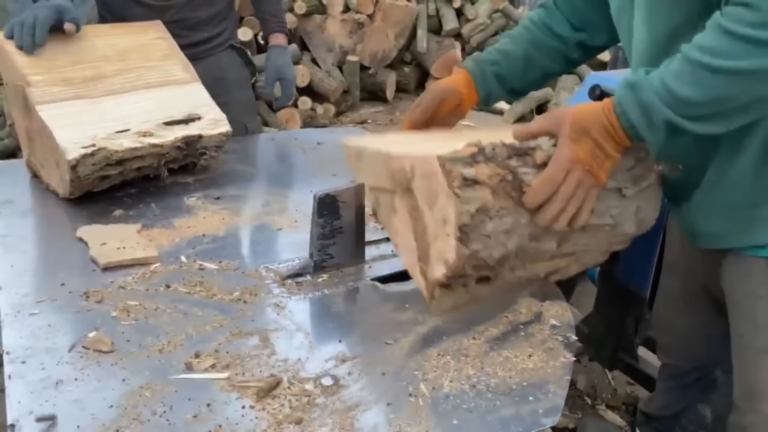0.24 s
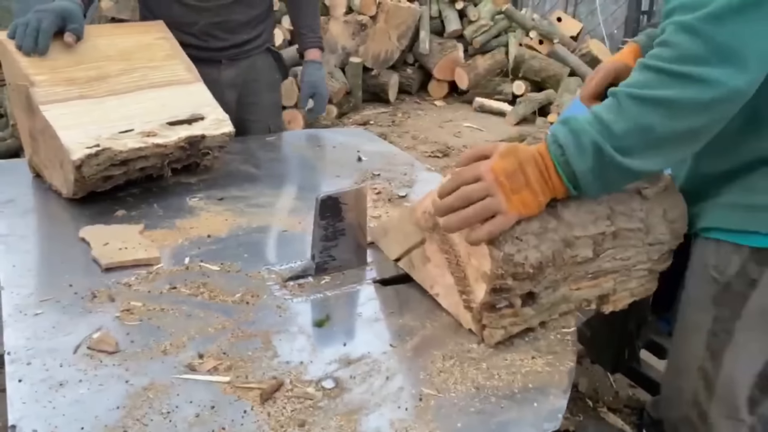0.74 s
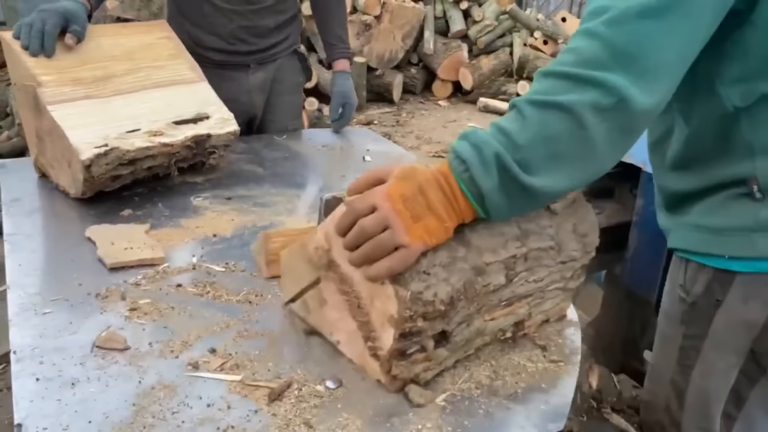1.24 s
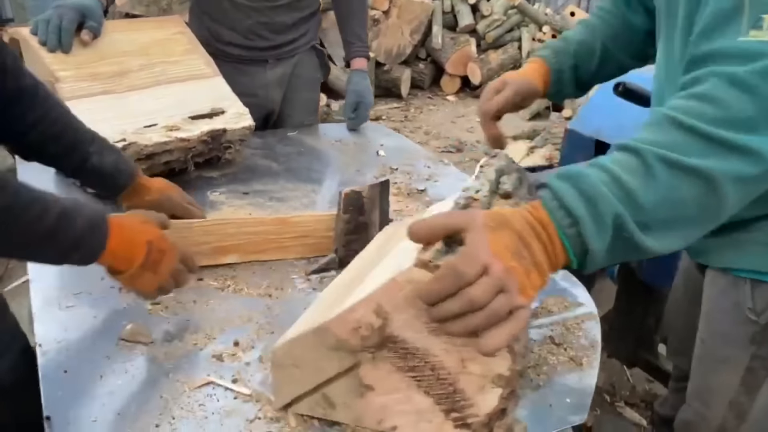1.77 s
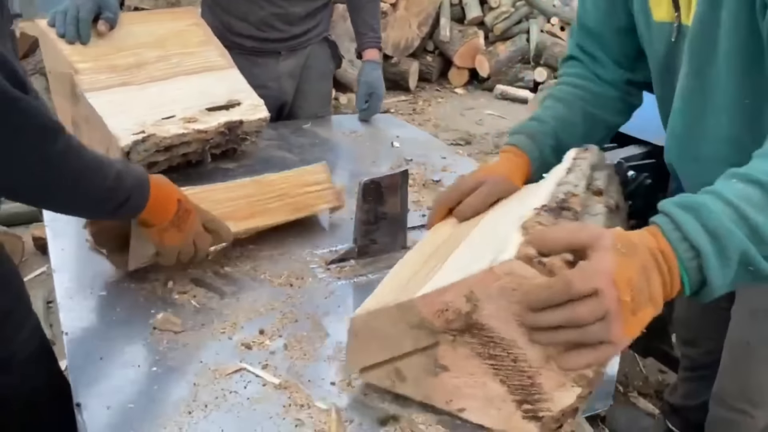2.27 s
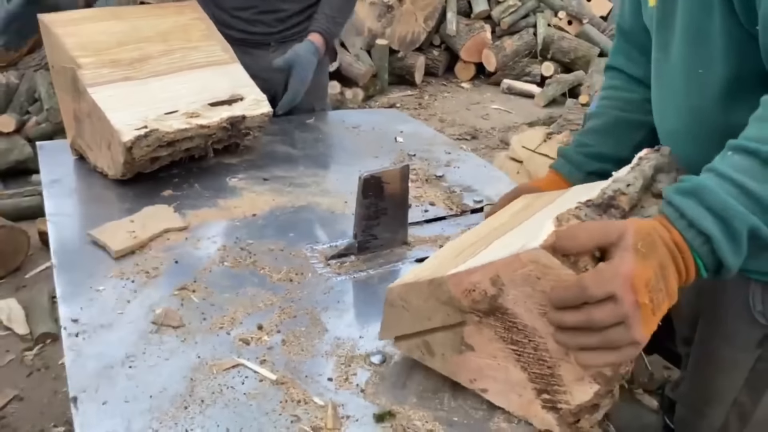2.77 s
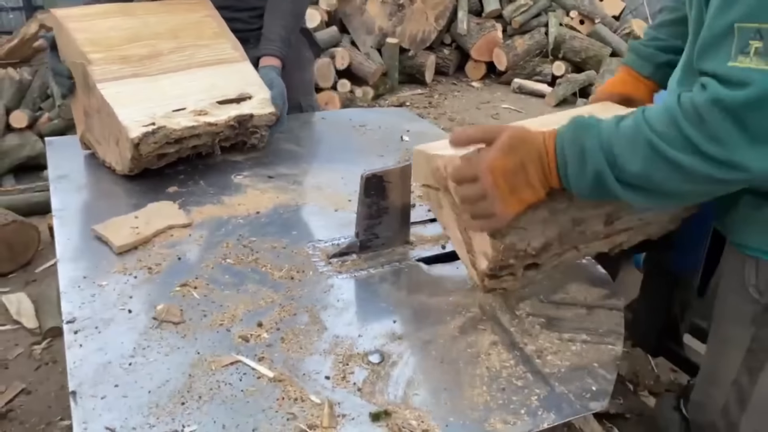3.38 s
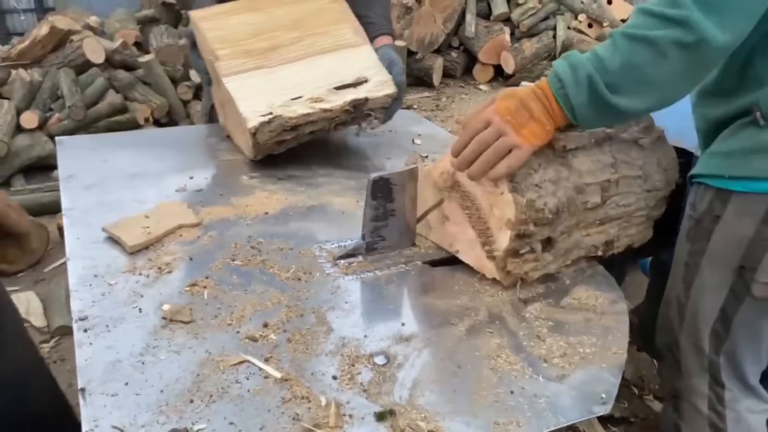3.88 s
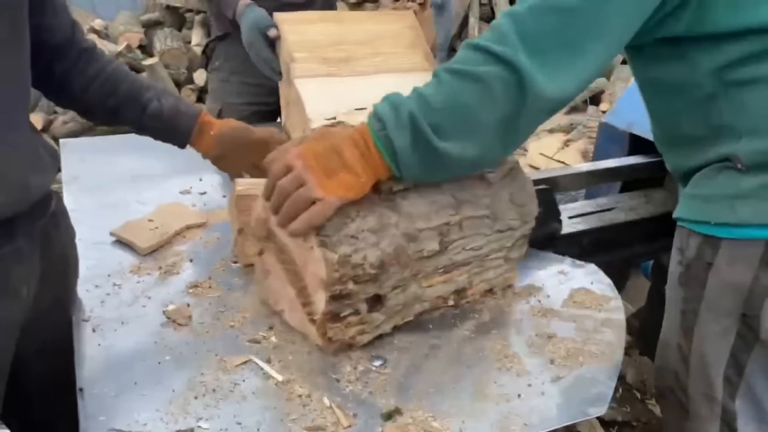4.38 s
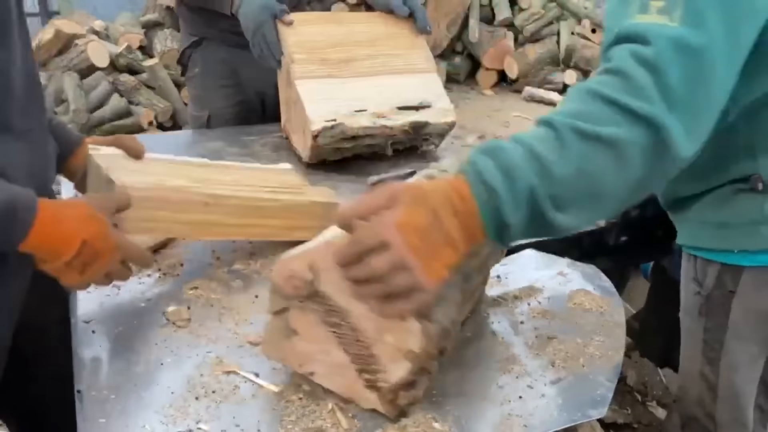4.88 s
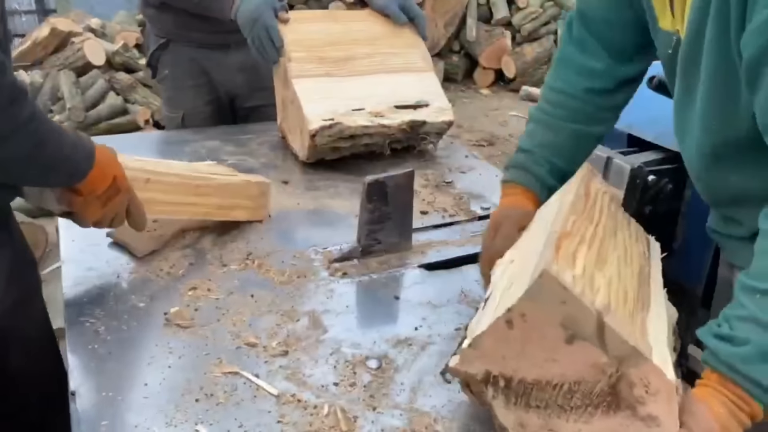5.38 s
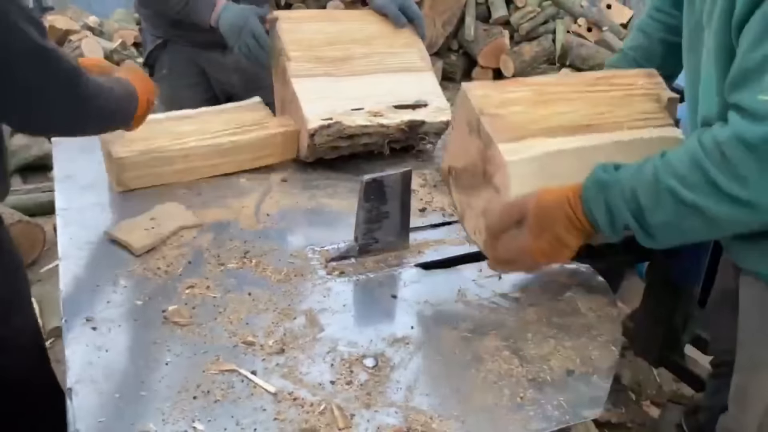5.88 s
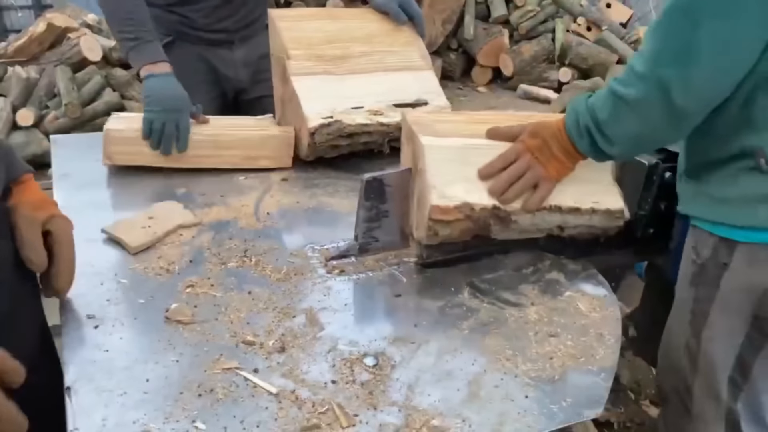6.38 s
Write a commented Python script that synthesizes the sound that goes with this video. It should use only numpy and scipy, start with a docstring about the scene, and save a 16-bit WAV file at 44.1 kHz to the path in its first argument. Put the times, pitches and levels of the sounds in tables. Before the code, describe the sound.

Over a steady low motor drone with a faint whine, a log bangs onto a hollow steel table. A wedge cracks it in sharp runs, fibres tear, and the piece judders aside. It is knocked back down and split again, then shuffled, clonked and banged once more. Close stereo microphone, outdoors, dry, no echo.

```python
"""First a steel frame is heard ringing out while wood slides; then logs thump onto a log splitter's steel table.
The wedge cracks each log open and tears it apart: random tiny impulses wake the wood and table resonances.
Halves judder and creak (gliding tones), bark rasps (narrow noise), and chips tick on the steel.
Underneath, a motor drones (coloured noise) and whines (wavering sines), and oil hisses as the ram travels."""
import sys
import numpy as np
from scipy import signal
from scipy.fft import rfft, irfft, next_fast_len
from scipy.io import wavfile
from scipy.ndimage import uniform_filter1d, map_coordinates

SR = 44100
rng = np.random.default_rng(int(sys.argv[2]) if len(sys.argv) > 2 else 0)


def inscribe(sig):
    """Save sig as 16-bit PCM at rate SR to the path in sys.argv[1].

    A 1-D sig is mono; a 2-D sig holds one channel per row.
    Samples are clipped to [-1, 1] before scaling.
    """
    pcm = np.round(np.clip(np.atleast_2d(sig).T, -1, 1) * 32767)
    wavfile.write(sys.argv[1], SR, pcm.astype(np.int16))


N = 292383
TIME = np.arange(N) / SR  # [s]

# All levels in the tables are relative; t60 is the time to fade by 60 dB.
# Motor-driven machine, broad noise: (frequency [Hz], level per Hz [dB])
DRONE_COLOUR = [(30, -50), (50, -16), (95, -2), (145, 1), (220, -9), (320, -14), (500, -15.5), (800, -24),
                (2300, -20.5), (3000, -26.5), (5200, -28), (7800, -43), (11000, -48.5)]
# Motor and pump tones: (frequency [Hz], level [dB])
WHINE_TONES = [(96.9, -38), (226.1, -46), (1077, -58.5), (1615, -53.5), (2417, -50.5), (5109, -63.5)]
# Ram pushing a log through the wedge:
# (wedge bites [s], halves part [s], burst level [dB], tearing level [dB], parting level [dB])
SPLITS = [(0.895, 1.989, -23, -30.5, -22), (3.854, 5.003, -16.5, -35.5, -23.5)]
# The steel frame ringing at the start: (frequency [Hz], level [dB], t60 [s])
FRAME_MODES = [(630, -2.5, 0.35), (1066, -5, 0.48), (1600, -4.5, 0.33), (2500, -6.5, 0.24)]
# Loose chips ticking on steel: (time [s], level [dB], pitch [Hz], t60 [s])
CHIP_TICKS = [(0.492, -24, 3350, 0.11), (0.577, -34, 3300, 0.13), (3.119, -34, 5600, 0.02),
              (4.43, -37.5, 10500, 0.069)]
# Bark rubbing the edge of the steel slot: (from [s], to [s], centre [Hz], width [Hz], level [dB])
RASPS = [(5.823, 5.984, 5120, 300, -37.5), (6.106, 6.288, 6050, 450, -41)]
# A log chattering on the sheet: (from [s], to [s], first rate [Hz], last rate [Hz], level [dB])
JUDDERS = [(1.941, 2.286, 112.6, 97.8, -22), (2.283, 2.912, 102.8, 95, -31), (4.21, 4.32, 98, 98, -22.5),
           (4.95, 5.23, 101.4, 88.7, -25), (5.9, 6.09, 119.6, 107.6, -20.5),
           (6.11, 6.25, 139.5, 129.6, -20.5)]
# Pressed wood creaking on steel: (from [s], to [s], first rate [Hz], last rate [Hz], level [dB])
CREAKS = [(4.4, 4.46, 556, 537, -30.5), (4.85, 4.95, 740, 685, -32), (5.94, 6.03, 605.5, 599, -29.5)]
# Resonances of a split-off piece: (frequency [Hz], level [dB], t60 [s])
BILLET_MODES = [(679, -7, 0.29), (990, -5.5, 0.28), (1362, -1.5, 0.072), (1984, -5, 0.06)]
# The piece is set down and rocks: (time [s], level [dB])
BILLET_HITS = [(5.141, -13), (5.153, -21), (5.175, -18.5)]
# Table top flexing under a log: (frequency [Hz], level over the thud [dB], t60 [s])
BOOM_MODES = [(135.2, -5.5, 0.28), (208.4, -3.5, 0.15)]
# Wood landing on or bumping the table:
# (time [s], level [dB], thud [dB], clack [dB], snap [dB], contact length [s])
KNOCKS = [(0.264, -4.5, -13, -2.5, -8, 0.0074), (0.367, -4, -4.5, -8.5, -23, 0.0078),
          (0.378, -5, -7.5, -5.5, -7, 0.0098), (0.49, -23.5, -3, 3, -3, 0.0098),
          (2.43, -21, -30, -9, -21, 0.049), (3.534, -6.5, -14, -3.5, -11, 0.034),
          (3.58, -5.5, -3, -6.5, -3, 0.028), (4.467, -8.5, -30, -6.5, -30, 0.03),
          (5.14, -16, -7, -1, -15.5, 0.011), (5.619, -31.5, 18.5, 0, -2, 0.023),
          (5.845, -9.5, -2.5, -11, -17, 0.019), (5.899, -12, -12, -11.5, -8.5, 0.035),
          (5.964, -12, -2, -19, -12.5, 0.018), (6.13, -16.5, 6, -4, -1, 0.009),
          (6.184, -14, 0.5, -12, -10, 0.011), (6.514, -1, -17, -5.5, -8.5, 0.011),
          (6.523, -18, 5, -3.5, 5, 0.022)]
# The log cracking on the wedge:
# (time [s], level [dB], thud [dB], clack [dB], snap [dB], break length [s])
CRACKS = [(0.884, -2, -22, -2, -7, 0.0094), (0.893, -8.5, -21, -16, -4, 0.017),
          (0.957, -11.5, -16, 0.5, -5, 0.022), (1.001, -1.5, -12.5, -8, -4, 0.0062),
          (1.013, -8, -10, 2.5, -14, 0.0055), (1.439, -18.5, -12, -5, -20, 0.0083),
          (1.571, -10.5, -11, -4, -13, 0.012), (1.931, -12.5, -3, 3, -4, 0.011),
          (3.842, -4, -23, -2.5, -10, 0.009), (3.872, -6.5, -7, -5.5, -13, 0.024),
          (3.949, -12, -4, 7, -1.5, 0.0076), (3.969, -4, -20, -2.5, -4, 0.018),
          (4.418, -20.5, -13, -4, -0.5, 0.0055), (4.949, -15.5, -5, 2, -2, 0.024)]
# Wood dragged over the sheet: (strongest at [s], rise [s], fall [s],
# crunch level [dB], rumble above crunch [dB], splinter above crunch [dB]); rise and fall span 20 dB
SLIDES = [(0.0, 0.092, 0.21, -31, 3, -21), (0.14, 0.47, 0.97, -43.5, 10, -8),
          (0.43, 0.035, 0.39, -28.5, -0.5, -19), (0.68, 0.3, 0.38, -31, 5, -16),
          (3.62, 0.097, 0.23, -19.5, 4, -12), (3.72, 0.12, 0.14, -35, 1, -18),
          (4.28, 0.86, 0.2, -27, 5.5, -10.5), (4.49, 0.31, 0.16, -21.5, 2, -14.5),
          (5.17, 0.57, 0.19, -26, -13, -15.5), (5.74, 0.15, 0.33, -30.5, 9.5, -8),
          (5.879, 0.11, 0.17, -22.5, 8, -11.5), (6.01, 0.19, 0.12, -32, 14, -5),
          (6.16, 0.26, 0.35, -24, -1, -11), (6.28, 0.054, 0.058, -23.5, 6, -4),
          (6.62, 0.095, 0.27, -17.5, -3, -8)]
# Colour of wood on steel: (frequency [Hz], level per Hz [dB])
WOOD_COLOUR = [(30, -54), (50, -27), (80, -3), (140, -5), (300, -5.5), (600, -6), (1200, -9.5),
               (2000, -13.5), (3900, -18.5), (5000, -15.5), (6200, -21), (7800, -33.5), (11000, -38.5)]
# Broad resonances of the table: (centre [Hz], width [Hz], boost [dB])
TABLE_MODES = [(96, 44, 3.4), (145, 22, 7.5), (211, 28, 4.2), (267, 45, 4.5), (369, 43, 3.6),
               (467, 9.1, 2.1), (557, 18, 4.1), (603, 17.5, 6.9)]
# Fading of the loaded sheet: (frequency [Hz], t60 [s])
SHEET_FADE = [(100, 0.14), (500, 0.029), (1700, 0.11), (6000, 0.093)]
# Thud, body, clack and snap bands: (low [Hz], high [Hz])
BANDS = [(20, 250), (250, 1000), (1000, 3000), (3000, 13000)]
# Left-right likeness, limited to -1..1 in use; it swings in the treble: (frequency [Hz], likeness)
LIKENESS = [(130, 1), (270, 0.98), (480, 0.71), (1400, 0.29), (3100, 0.51), (3600, -0.12), (4400, 0.39),
            (5500, -0.28), (6600, 0.55), (7500, 1), (8400, -0.65), (9400, -1.52), (10400, 1)]
# Balance of the two ports: (frequency [Hz], left minus right [dB])
PORT_BALANCE = [(350, 0), (750, 3.5), (1200, 1.4), (2350, -3.1), (3800, 1.8), (5400, -2.2), (7500, .6)]
# Phase between the ports: (frequency [Hz], left leads by [radians])
PORT_LEAD = [(230, 0), (600, .6), (1300, .1), (1700, -.7), (2100, -.1), (2350, 1.1), (3300, 2.9), (3750, 0)]

TOP_HZ = 11780  # nothing is left above this
# The log bursts open, the last fibres give way, the halves slide clear; rises and falls span 20 dB.
BURST_S, BURST_RISE_S, BURST_FALL_S = 0.098, 0.03, 0.16
PART_RISE_S, PART_FALL_S = 0.6, 0.19
# Colours in dB: (rumble, crunch, splinter)
BURST_COLOUR, TEAR_COLOUR, PART_COLOUR = (-3.5, 0, -12), (0, 0, -16), (1.9, 0, -14.5)
# The ram scrapes back along its rail; its level again is (rumble, crunch, splinter).
RETURN_S, RETURN_FALL_S, RETURN_SCRAPE_DB = 0.54, 0.5, (-37, -39, -45)
# Valve hiss while the ram advances, at the end of its travel, and running back.
OIL_PUSH_DB, OIL_PEAK_DB, OIL_RETURN_DB = -56, -40, -50.5
OIL_RISE_S, OIL_FALL_S = 0.31, 0.16  # for 20 dB
RASP_EDGE_S = 0.052  # the rubbing sets in and lets go by 20 dB
CLICK_S = 0.0024  # t60 of the dry click at a contact
SHEET_TAIL_DB, SHEET_TAIL_S = -7, 0.35  # the sheet's shiver after a break in the wood, and its t60


def amp(db):
    """Turn decibels into gain."""
    return 10 ** (np.asarray(db) / 20)


def unit(x):
    """Scale to an rms (average strength) of 1."""
    return x / np.sqrt(np.mean(x ** 2) + 1e-20)


def along(points, hz):
    """Read a value between (frequency, value) points on a log frequency axis."""
    f, v = np.transpose(points)
    return np.interp(np.log(hz + 1), np.log(f + 1), v)


def wobble(rate):
    """Draw a smooth random curve with rate knots a second."""
    knots = rng.standard_normal(int(N * rate / SR) + 4)
    return map_coordinates(knots, [TIME * rate])


def swell(start, stop, rise_s, fall_s):
    """Gain that rises to 1 at start, holds until stop and falls; rise and fall times span 20 dB."""
    before, after = np.maximum(start - TIME, 0), np.maximum(TIME - stop, 0)
    return amp(-20 * (before / rise_s + after / fall_s))


def filtered(x, response):
    """Shape x by a response that depends on frequency."""
    n = x.shape[-1]
    m = next_fast_len(n + 8192)  # spare room for the filter's tail
    spectrum = rfft(x, m) * response(np.fft.rfftfreq(m, 1 / SR))
    return irfft(spectrum, m)[..., :n]


def noise(gain, size):
    """Coloured stereo noise of rms 1, whose left-right likeness changes with frequency."""
    def mid_side(hz):
        turn = np.arccos(np.clip(along(LIKENESS, hz), -1, 1)) / 2
        return gain(hz) * [np.cos(turn), np.sin(turn)]

    mid, side = filtered(rng.standard_normal((2, size)), mid_side)
    return unit(np.array([mid + side, mid - side]))


def hiss(centre_hz, width_hz, size):
    """Noise gathered round one resonance."""
    return noise(lambda hz: 1 / (1 + (2 * (hz - centre_hz) / width_hz) ** 2), size=size)


def add(track, sound, s):
    """Mix a sound into a track at time s."""
    part = track[:, round(s * SR):][:, :sound.shape[1]]
    part += sound[:, :part.shape[1]]


def drive(drone_db, whine_db, drift, flutter_db, swell_db):
    """The motor's rumble and fan noise, with shaft and pump tones that waver, swell and fade."""
    turns = np.cumsum(1 + drift * wobble(6.6)) / SR
    whine = np.zeros(N)
    for hz, db in WHINE_TONES:
        level = amp(db + flutter_db * wobble(16) + swell_db * wobble(3.36))
        whine += level * np.sin(2 * np.pi * hz * turns + 0.25 * wobble(20))
    housing_db = lambda hz: 6 / (1 + (2 * (hz - 2420) / 90) ** 2)  # the pump housing sings along
    rumble = noise(lambda hz: amp(along(DRONE_COLOUR, hz) + housing_db(hz)), size=N)
    return rumble * amp(drone_db + 0.16 * wobble(34)) + amp(whine_db) * np.sqrt(2) * whine


def oil(centre_hz, width_hz):
    """Oil squeezed through the valve hisses: softly on the push, most at the end of travel, then on return."""
    flow = []
    for bite, part, *_ in SPLITS:
        flow += [amp(OIL_PUSH_DB) * swell(bite + BURST_S, part, BURST_FALL_S, OIL_FALL_S),
                 amp(OIL_PEAK_DB) * swell(part, part, OIL_RISE_S, OIL_FALL_S),
                 amp(OIL_RETURN_DB) * swell(part, part + RETURN_S, OIL_RISE_S, RETURN_FALL_S)]
    level = np.linalg.norm(flow, axis=0) * amp(wobble(29))
    return level * hiss(centre_hz, width_hz, size=N)


def struck(modes, s, db, rattle):
    """A body's resonances die away; loose contact with its support blurs their pitch."""
    out, t = np.zeros((2, N)), np.arange(SR // 2) / SR
    for hz, level_db, t60 in modes:
        wander = rattle * np.cumsum(rng.standard_normal(len(t))) / np.sqrt(SR)
        offset = rng.normal(0, 0.09, (2, 1))  # left and right differ a little
        phase = 2 * np.pi * hz * t + uniform_filter1d(wander, SR // 500) + offset
        fade = amp(db + level_db - 60 * t / t60)
        add(out, fade * (1 - np.exp(-t / 0.0018)) * np.sin(phase), s)
    return out


def frame():
    """The steel frame is already ringing at the start and dies away."""
    return struck(FRAME_MODES, s=0, db=-28.5, rattle=5.7)


def chips(width_hz):
    """Each loose chip gives one short, bright tick of narrow noise."""
    out, t = np.zeros((2, N)), np.arange(SR // 8) / SR
    for s, db, hz, t60 in CHIP_TICKS:
        add(out, amp(db - 60 * t / t60) * hiss(hz, width_hz, size=len(t)), s)
    return out


def rasp(uneven_db):
    """Bark rubbing the edge of the slot makes one thin resonance after another sing unevenly."""
    out = np.zeros((2, N))
    for start, stop, hz, width_hz, db in RASPS:
        flicker_db = np.clip(uneven_db * wobble(35), -4, 4)
        level = amp(db + flicker_db) * swell(start, stop, RASP_EDGE_S, RASP_EDGE_S)
        out += level * hiss(hz, width_hz, size=N)
    return out


def stick_slip(rows, rough, overtone_db):
    """Wood sticks and slips on steel at a gliding, uneven rate: slowly a judder, quickly a creak."""
    out = np.zeros(N)
    for start, stop, first_hz, last_hz, db in rows:
        progress = np.clip((TIME - start) / (stop - start), 0, 1)
        rate_hz = first_hz + (last_hz - first_hz) * progress
        phase = 2 * np.pi * np.cumsum(rate_hz * (1 + rough * wobble(first_hz / 2))) / SR
        level = amp(db + 1.7 * wobble(24.86)) * np.sqrt(4 * progress * (1 - progress))
        out += level * (np.sin(phase) + amp(overtone_db) * np.sin(2 * phase))
    return out


def billet():
    """A split-off piece clonks on the table with its own woody note."""
    return sum(struck(BILLET_MODES, s, db, rattle=11.4) for s, db in BILLET_HITS)


def body(hz, band):
    """Gain of wood and table in one frequency band."""
    low, high = BANDS[band]
    modes_db = sum(db / (1 + (2 * (hz - centre) / width) ** 2) for centre, width, db in TABLE_MODES)
    return amp(along(WOOD_COLOUR, hz) + modes_db) * (hz > low) * (hz <= high)


def ring(band, click_db, tail_db, tail_t60, ripple_db, ripple_hz):
    """One contact wakes crowded resonances: a dry click, a damped ring and a weak long shiver of the sheet."""
    t = np.arange(SR // 3) / SR
    centre = np.sqrt(np.prod(BANDS[band]))
    click = amp(click_db - 60 * t / CLICK_S)
    damped = amp(-60 * t / along(SHEET_FADE, centre))
    shiver = amp(tail_db - 60 * t / tail_t60)
    onset = 1 - np.exp(-(2 * centre * t) ** 2)  # a resonance needs half a cycle to start
    knots = rng.standard_normal(size=400)  # each spot of contact favours other resonances
    ripple = lambda hz: amp(ripple_db * np.interp(hz / ripple_hz, np.arange(len(knots)), knots))
    return noise(lambda hz: body(hz, band) * ripple(hz), size=len(t)) * (click + damped + shiver) * onset


def slips(rate, spread_db, size):
    """Random tiny impulses, about rate a second, a few much stronger than the rest."""
    chance, strength = rng.random(size), rng.exponential(size=size)
    sign = rng.choice([-1, 1], size)
    return (chance < rate / SR) * sign * amp(spread_db * np.minimum(strength, 3.5))


def blows(rows, gains_db, rate, spread_db, lead, build_s, click_db, tail_db, tail_t60):
    """Each blow is a first contact and a flurry that builds as bark crushes, then fades, ringing the table."""
    out, t = np.zeros((2, N)), np.arange(SR // 8) / SR
    for s, db, thud_db, clack_db, snap_db, length in rows:
        flurry = (1 - np.exp(-t / build_s)) * np.exp(-(t / length) ** 2)
        force = slips(rate, spread_db, size=len(t)) * flurry
        force[0] = lead  # the first contact
        for band, colour_db in enumerate([thud_db, 0, clack_db, snap_db]):
            answer = ring(band, click_db, tail_db, tail_t60, ripple_db=3.5, ripple_hz=107.5)
            sound = signal.fftconvolve(force[None], answer, axes=1)
            strength = np.sqrt(np.mean(sound[:, :SR // 30] ** 2))  # rms of the opening
            add(out, sound / strength * amp(db + colour_db + gains_db[band]), s)
    return out


def knocks():
    """Logs touch down on the sheet in several places; the heavier the thud, the more the table booms."""
    boom = sum(struck(BOOM_MODES, s, db + thud_db, rattle=10) for s, db, thud_db, *_ in KNOCKS)
    return boom + blows(KNOCKS, gains_db=[-11.5, -12, -9.5, -9.5], rate=1100, spread_db=2.5, lead=1.7,
                        build_s=0.00082, click_db=3, tail_db=-10.5, tail_t60=0.51)


def cracks():
    """The wedge bursts the log open in quick runs of breaks."""
    return blows(CRACKS, gains_db=[-10.5, -14, -12, -12], rate=650, spread_db=3, lead=1.6,
                 build_s=0.0017, click_db=2, tail_db=SHEET_TAIL_DB, tail_t60=SHEET_TAIL_S)


def effort(register):
    """How hard slides, splits and the ram's return work in one register: 0 rumble, 1 crunch, 2 splinter."""
    parts = []
    for s, rise, fall, db, rumble_db, splinter_db in SLIDES:
        colour_db = (rumble_db, 0, splinter_db)[register]
        parts.append(amp(db + colour_db) * swell(s, s, rise, fall))
    for bite, part, burst_db, tear_db, part_db in SPLITS:
        burst, tear = amp(burst_db + BURST_COLOUR[register]), amp(tear_db + TEAR_COLOUR[register])
        parting, scrape = amp(part_db + PART_COLOUR[register]), amp(RETURN_SCRAPE_DB[register])
        parts += [burst * swell(bite, bite + BURST_S, BURST_RISE_S, BURST_FALL_S),
                  tear * swell(bite, part, BURST_RISE_S, PART_FALL_S),
                  parting * swell(part, part, PART_RISE_S, PART_FALL_S),
                  scrape * swell(part, part + RETURN_S, PART_RISE_S, RETURN_FALL_S)]
    return np.linalg.norm(parts, axis=0)


def tearing(rate, spread_db, gains_db, jerk_db, count):
    """Fibres snap and bark slips in jerks; the load passes between spots that each ring in their own way."""
    out, hop = np.zeros((2, N)), N // count
    force = slips(rate, spread_db, size=N + 2 * hop)
    force[hop:hop + N] *= amp(jerk_db * wobble(30))
    load = np.sin(np.pi * np.arange(2 * hop) / (2 * hop))  # neighbouring spots overlap by half
    for band, register in enumerate([0, 1, 1, 2]):
        grain = np.zeros((2, N + hop))
        for start in range(0, N, hop):
            answer = ring(band, click_db=3, tail_db=SHEET_TAIL_DB, tail_t60=SHEET_TAIL_S,
                          ripple_db=3, ripple_hz=70.06)
            pressed = force[start:start + 2 * hop] * load
            add(grain, signal.fftconvolve([pressed], answer, axes=1), start / SR)
        out += unit(grain[:, hop:]) * effort(register) * amp(gains_db[band])
    return out


def scene():
    """All sources together, close by in the open air, with no echo added."""
    machine = drive(drone_db=-35.5, whine_db=-1, drift=0.001, flutter_db=2, swell_db=0.5)
    machine = machine + oil(centre_hz=9600, width_hz=2700)
    judder = stick_slip(JUDDERS, rough=0.0498, overtone_db=-9.5)
    creak = stick_slip(CREAKS, rough=0.12, overtone_db=-4)
    rubbing = judder + creak + rasp(uneven_db=11)
    torn = tearing(rate=520, spread_db=4, gains_db=[-1, 1, -7, 3], jerk_db=1.04, count=36)
    wood = billet() + knocks() + cracks() + torn
    return machine + frame() + chips(width_hz=760) + rubbing + wood


def record(dry):
    """Each microphone port has its own colour and phase; peaks are rounded off and the top is cut."""
    half = np.array([[0.5], [-0.5]])  # shared between left and right

    def port(hz):
        return amp(half * along(PORT_BALANCE, hz)) * np.exp(1j * half * along(PORT_LEAD, hz))

    ports = filtered(dry, port)
    rounded = ports / (1 + np.abs(ports) ** 6) ** (1 / 6)
    return filtered(rounded, lambda hz: hz < TOP_HZ)


dry = scene()
out = record(dry)
inscribe(out)
```